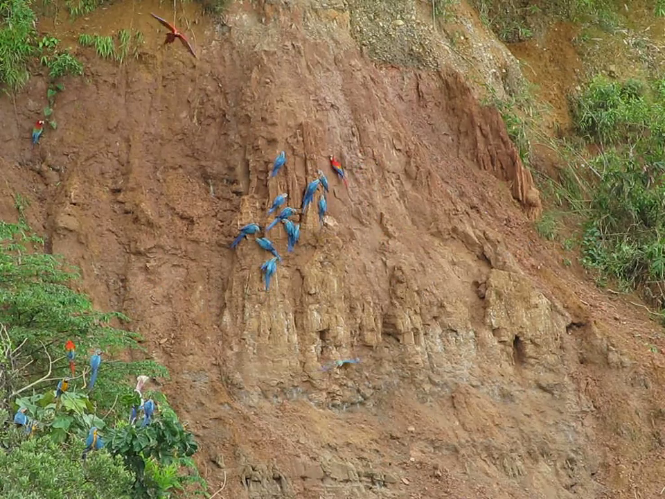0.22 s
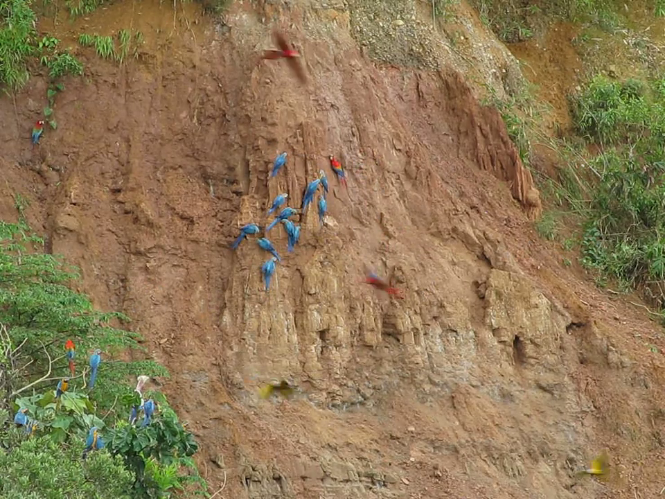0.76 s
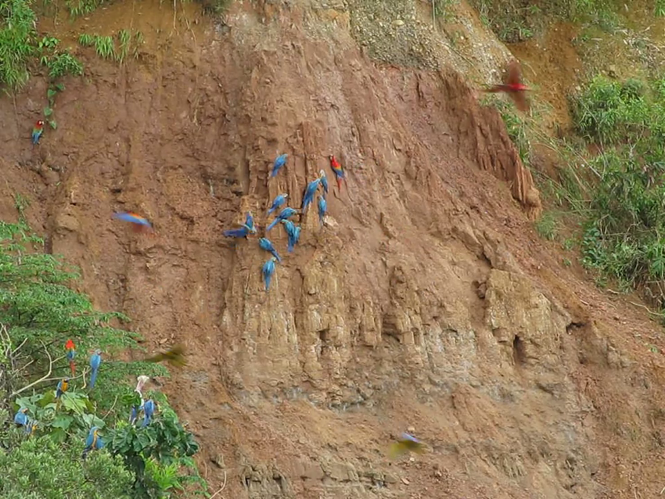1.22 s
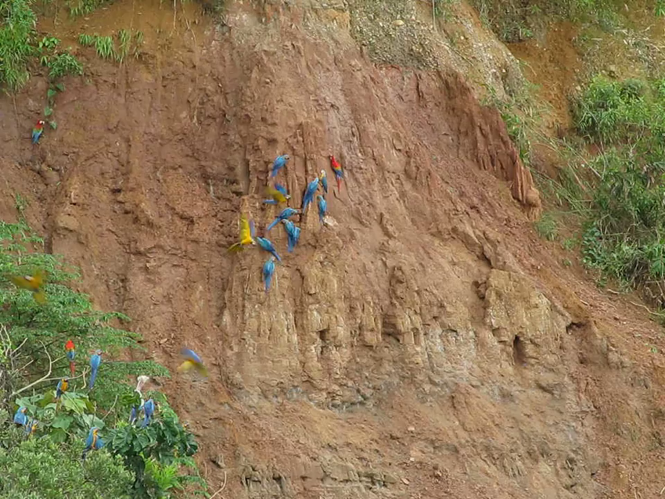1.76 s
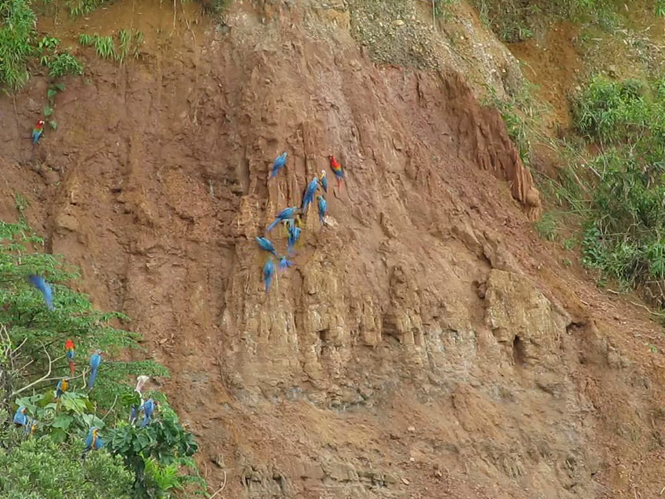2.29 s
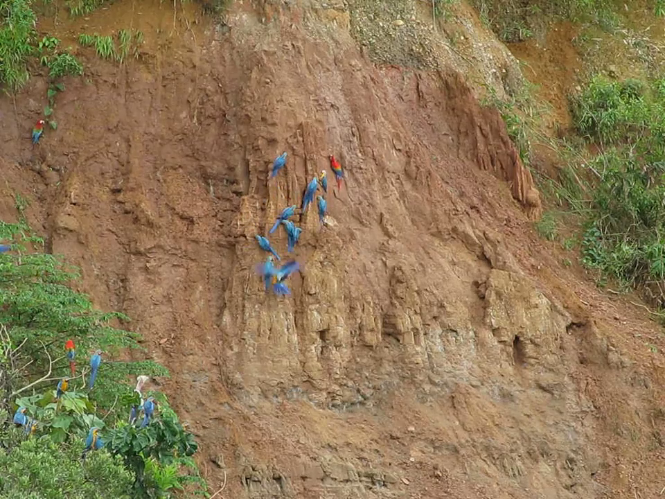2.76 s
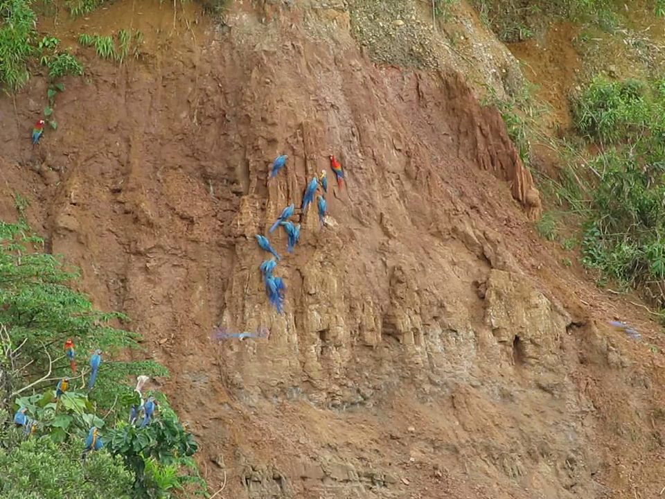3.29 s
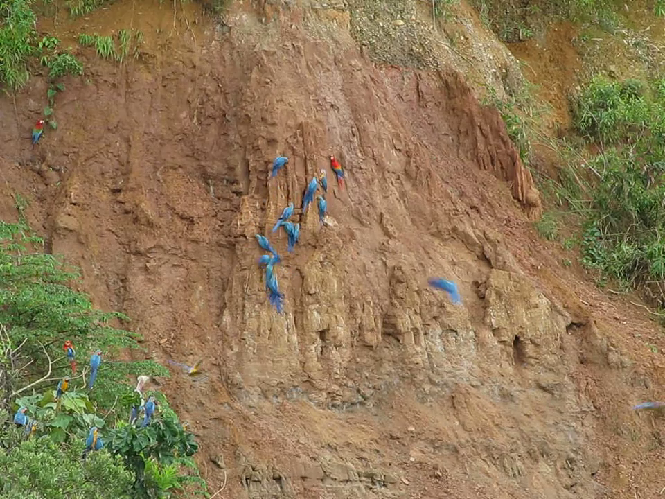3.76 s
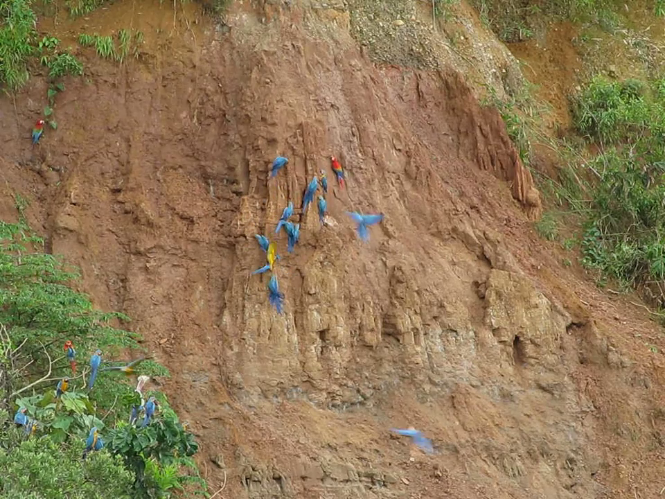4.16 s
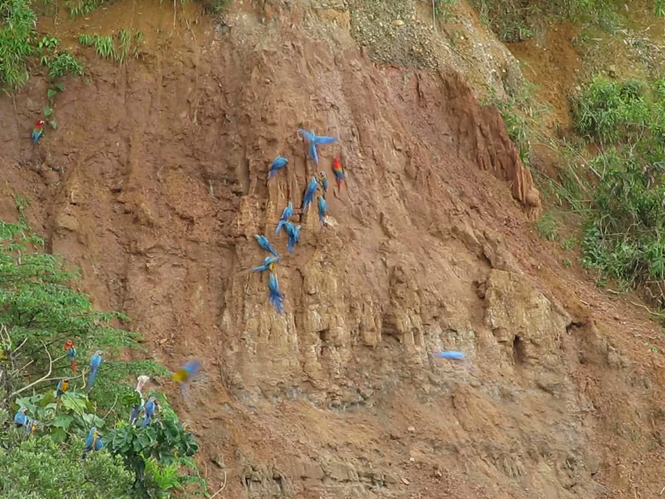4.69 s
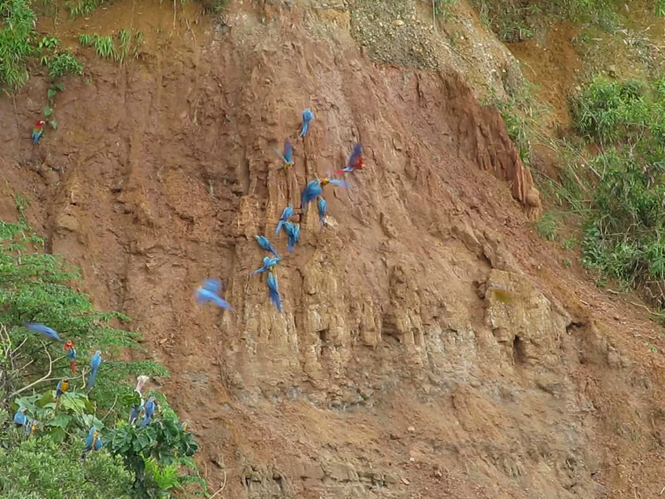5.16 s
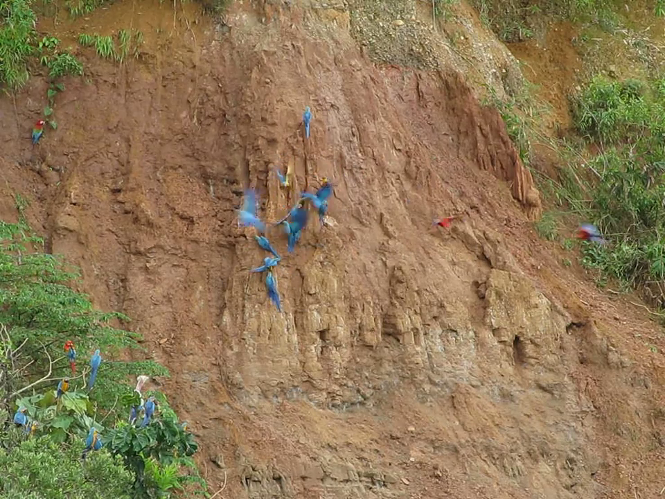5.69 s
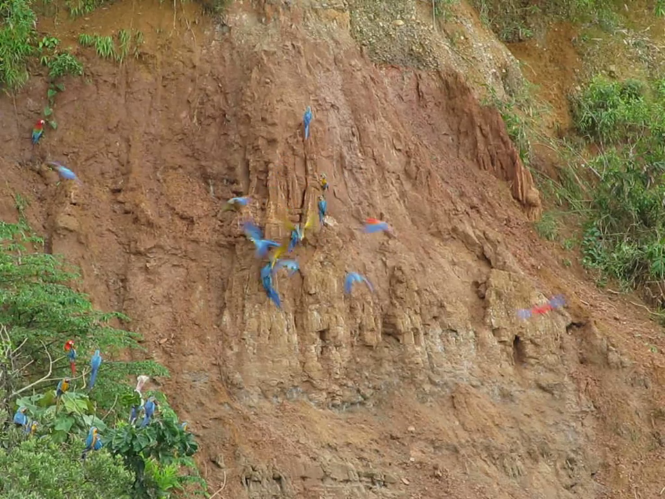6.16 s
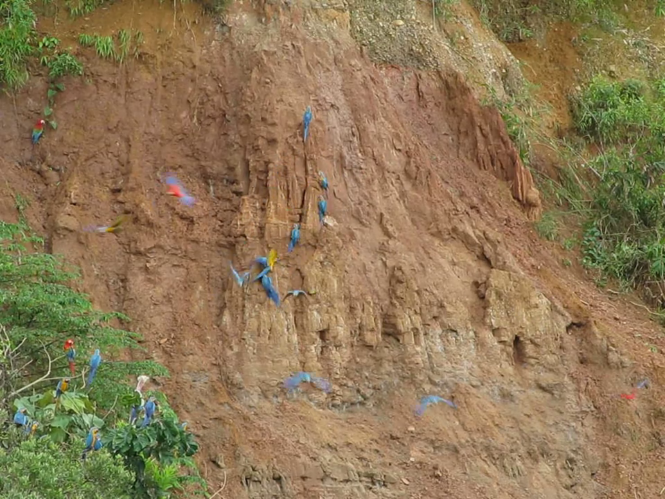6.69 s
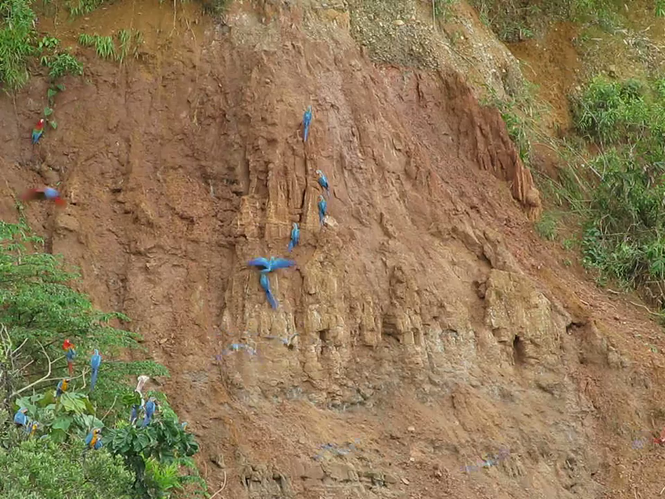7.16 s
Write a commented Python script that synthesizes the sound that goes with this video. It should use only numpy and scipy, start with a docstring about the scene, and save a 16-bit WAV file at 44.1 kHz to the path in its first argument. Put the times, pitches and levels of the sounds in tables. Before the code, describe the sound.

A flock of macaws calls hoarsely, near and far, while cicadas whine and other insects rasp in waves.

```python
"""Macaws squawk across a rainforest river, in mono: near birds in runs of quick rasping syllables that
end on a falling note, the rest of the flock blurred by a clay cliff and trees. Each voice is a train of
pulses from the syrinx, filtered by throat and beak. High above, cicadas whine with buckling tymbals
and other insects rasp their wing files in waves. Bird calls add thin whistles and short gliding tones,
a few soft knocks sound close by, and river and leaves lay a faint hush under it all."""
import sys
import numpy as np
from scipy import signal
from scipy.fft import rfft, irfft
from scipy.io import wavfile
from scipy.ndimage import uniform_filter1d

SR = 44100
rng = np.random.default_rng(int(sys.argv[2]) if len(sys.argv) > 2 else 0)


def log_audio(samples):
    """Write samples as a 16-bit WAV file to the path given in sys.argv[1]."""
    # one column per channel
    frames = np.atleast_2d(samples).T
    # limit to full scale, then quantise
    limited = np.clip(frames, -1, 1)
    pcm = np.round(limited * 32767).astype(np.int16)
    wavfile.write(sys.argv[1], SR, pcm)


N = 328104
TIME = np.arange(N) / SR

# Spectral envelopes of the sources: f/Hz, relative level/dB
HUSH_SPECTRUM = [(20, -5), (60, 1.5), (150, 1.5), (300, 3), (600, 6.5), (1200, 9), (2500, 5), (5000, 6),
                 (9000, -8), (15500, -41)]
CICADA_SPECTRUM = [(4800, -30.5), (5500, -22), (6150, -11), (6600, -15.5), (7000, -8.5), (7300, -4),
                   (7550, -2.5), (7750, -14.5), (8000, -19), (8500, -47)]
RASP_SPECTRUM = [(4000, -23), (6000, -8.5), (8200, -14), (9300, -8.5), (10500, -13), (11200, -3),
                 (11700, -1.5), (12300, -4), (13200, -9.5), (14400, -8), (15700, -12.5)]
FAR_VOICE_SPECTRUM = [(150, -59), (350, -39), (560, -23), (640, -13.5), (740, -8), (1150, -2.2),
                      (1600, 0.5), (2100, -2.5), (2800, -1), (3600, -2.5), (4600, -8), (5600, -16.5),
                      (8000, -25), (12000, -40)]
THROAT_SPECTRUM = [(120, -77), (300, -42), (450, -19.5), (700, -7), (1000, -18.5), (1400, -7), (2200, 0),
                   (3050, -3.5), (3500, -1), (4100, -0.5), (5000, -3), (5800, -8), (8000, -10),
                   (10000, -16), (15000, -49)]
# Surges of the rasping chorus: centre t/s, length/s, relative level/dB
CHORUS_SURGES = [(0.146, 0.28, -40), (0.415, 0.14, -45.5), (0.763, 0.3, -38.5), (1.42, .32, -41),
                 (1.984, .35, -41), (2.352, 0.16, -46), (2.72, 0.44, -42.5), (3.505, 0.38, -41.5),
                 (3.92, 0.14, -47.5), (4.23, 0.31, -41.5), (4.49, 0.15, -46.5), (5.054, 0.23, -45.5),
                 (5.296, 0.25, -41.5), (5.59, 0.19, -46.5), (6.158, 0.27, -42), (6.86, 0.15, -49)]
# Short lisps of another insect: centre t/s, level/dB
INSECT_LISPS = [(1.66, -55), (3.02, -56), (4.68, -54.5), (5.83, -53), (6.48, -58), (7.08, -57)]
# Soft knocks: t/s, level/dB, thud f/Hz, tick level re thud/dB
SOFT_KNOCKS = [(1.248, -42.5, 334, 11), (1.429, -53, 356, 13), (1.58, -46, 400, -6), (1.685, -50, 437, -1),
               (1.73, -50, 425, 5), (1.78, -51, 380, -6), (1.808, -51, 485, 3), (1.85, -50, 410, -8),
               (3.428, -39.5, 255, -3)]
# Thin whistles and short gliding tones of bird calls:
# start t/s, length/s, first f/Hz, middle f/Hz, last f/Hz, level/dB
GLIDING_TONES = [(1.78, 0.16, 1910, 2060, 2530, -53), (1.899, 0.16, 2300, 3010, 3150, -49.5),
                 (1.87, 0.155, 1087, 1160, 1080, -59), (2.971, .08, 2690, 2740, 2700, -55),
                 (3.011, 0.057, 3260, 3280, 3220, -46.5), (3.07, .2, 2510, 2490, 2400, -60),
                 (3.384, 0.052, 3155, 2665, 2330, -45), (4.74, 0.21, 1266, 1172, 1100, -53)]
# Far macaw calls: start t/s, end t/s, top f/Hz, roughness (0-1), beak f/Hz, relative level/dB
FAR_SQUAWKS = [(-.15, 0.061, 412, .4, 1800, -39.5), (0.06, 0.51, 412.2, 0.46, 1760, -37.5),
               (0.23, 0.511, 525, .47, 1500, -37), (0.529, 0.95, 469, 0.56, 1610, -33.5),
               (0.86, 1.238, 455.5, 0.54, 1360, -43), (1.21, 1.68, 424, 0.36, 2130, -42),
               (1.3, 1.918, 398.4, 0.55, 1240, -50), (1.989, 2.22, 517.3, 0.18, 1580, -41),
               (2.1, 2.5, 513, .12, 2050, -36.5), (2.42, 2.749, 407, 0.45, 1640, -40.5),
               (2.699, 2.919, 480, 0.36, 1450, -55.5), (3.19, 3.316, 391, 0.76, 1570, -59),
               (3.419, 3.631, 379, 0.53, 1150, -43.5), (3.48, 3.639, 400, 0.57, 3330, -47),
               (3.85, 4.22, 423.6, .45, 1800, -40), (4.239, 4.621, 508.4, 0.48, 2060, -42.5),
               (4.702, 5.001, 398, 0.63, 1200, -54), (4.83, 5.149, 405.2, 0.39, 1560, -39.5),
               (4.869, 5.421, 386.5, 0.57, 810, -42.5), (5.199, 5.552, 410.6, 0.36, 1600, -38.5),
               (5.35, 5.747, 471.6, .35, 2630, -39), (5.45, 5.85, 474, 0.54, 1020, -44.5),
               (5.8, 6.139, 420, .55, 1290, -55), (6.081, 6.301, 384.7, .55, 1150, -39.5),
               (6.28, 6.65, 385.2, 0.64, 834, -39.5), (6.69, 6.811, 408.8, 0.13, 1620, -39),
               (6.8, 7.2, 426.6, 0.51, 1750, -40), (6.949, 7.21, 612, 0.22, 1260, -48.5)]
# Near macaw calls, each a run of evenly spaced syllables and a closing note:
# first t/s, spacing/s, count, first f/Hz, middle f/Hz, closing f/Hz, first level/dB, last level/dB,
# closing centre t/s, closing length/s, closing level/dB, fall coefficient/semitones,
# beak f/Hz, low resonance trim/dB, roughness (0-1)
NEAR_SQUAWKS = [(0.129, 0.039, 4, 409.5, 443.5, 453, -36.5, -37, 0.278, 0.035, -34, 2, 2900, 5, .28),
                (0.351, 0.04, 3, 429, 412, 365, -30.5, -36, 0.484, 0.036, -33, 5.1, 2950, 15, 0.38),
                (0.593, 0.039, 5, 462.7, 453, 492, -21, -20.5, 0.785, 0.04, -21, 14, 2800, -12, .2),
                (0.842, 0.041, 3, 421.3, 432, 472, -31, -28, 0.97, 0.05, -28.5, 9, 2850, 1, .2),
                (1.238, 0.03, 1, 433, 433, 431, -38, -40, 1.27, 0.05, -35, 2.1, 3130, 6, .59),
                (1.382, 0.042, 3, 392.4, 416, 440, -40.5, -36, 1.506, 0.044, -35, 5.2, 2530, 7, 0.23),
                (2.136, 0.03, 1, 506, 524, 535, -37, -37, 2.187, 0.06, -34.5, 4.3, 2150, -1, 0.25),
                (2.324, 0.03, 1, 401, 396, 396, -39, -39, 2.366, 0.05, -34.5, 2, 2800, 9, 0.45),
                (2.521, 0.038, 4, 375, 379, 414.2, -35, -31.5, 2.683, 0.04, -28, 9, 2770, 0.5, 0.44),
                (3.842, 0.038, 5, 382, 428, 446, -35.5, -27.7, 4.055, 0.062, -26.5, 12, 2560, 4.5, 0.16),
                (4.109, 0.03, 1, 337, 336, 333, -32.5, -32, 4.147, 0.03, -37, 1.8, 3150, 10, 0.92),
                (4.283, 0.038, 2, 412, 450, 513, -41, -38, 4.358, 0.06, -39.5, 1.87, 2600, 23, .5),
                (5.053, 0.04, 1, 421, 430, 441, -41, -40, 5.098, 0.045, -37, 3, 2900, 9, .5),
                (5.24, 0.043, 5, 378.7, 428, 425.7, -37.5, -29, 5.442, 0.028, -31, 10, 3200, 8, .22),
                (6.381, 0.042, 5, 426, 434, 464, -36.5, -32.5, 6.595, 0.04, -32, 10, 2730, -9, 0.15),
                (6.744, 0.04, 1, 400, 398, 394, -33, -33, 6.784, 0.031, -33.5, 2.5, 2530, 9, .08),
                (6.825, 0.046, 2, 436, 455, 454, -36, -35, 6.907, 0.032, -35, 4.4, 2730, -9, 0.37),
                (7.008, 0.047, 3, 406.3, 428, 431, -36.5, -37.5, 7.158, 0.046, -39.5, 3.2, 2750, -3, 0.47)]


def undb(db):
    """Amplitude ratio of a level in decibels."""
    return 10 ** (np.asarray(db) / 20)


def unit(x):
    """Normalisation to an rms of one."""
    return x / np.sqrt(np.mean(x ** 2) + 1e-18)


def running_rms(x, seconds):
    """Envelope as the root of a moving average of power."""
    return np.sqrt(np.abs(uniform_filter1d(x ** 2, int(seconds * SR))) + 1e-12)


def add(out, start, x):
    """Superposition of x on out from a start time on."""
    i = int(start * SR)
    a, b = max(i, 0), min(i + len(x), N)
    out[a:b] += x[a - i:b - i]


def walk(rate, size=N):
    """Smooth random modulation with a spread near one."""
    knots = rng.standard_normal(int(size / SR * rate) + 3)
    line = np.interp(np.arange(size) * rate / SR, np.arange(len(knots)), knots)
    return 1.25 * uniform_filter1d(line, int(SR / rate / 2) + 1)


def arc(u, first, middle, last):
    """Parabolic interpolation through three values as u runs from -1 to 1."""
    return middle + u * (last - first) / 2 + u ** 2 * ((last + first) / 2 - middle)


def sine(hz):
    """Oscillation whose phase is the integral of its frequency."""
    return np.sin(2 * np.pi * np.cumsum(hz) / SR)


def colour(x, points, size=2048):
    """Minimum-phase filtering by a spectral envelope (f/Hz, level/dB)."""
    hz, db = np.transpose(points)
    bin_hz = np.arange(size // 2 + 1) * SR / size
    log_gain = np.log(undb(np.interp(np.log(bin_hz + 1), np.log(hz), db)))
    cepstrum = irfft(log_gain)[:size // 2]
    cepstrum[1:] *= 2
    response = irfft(np.exp(rfft(cepstrum, size)))[:size // 2]
    return signal.fftconvolve(x, response)[:len(x)]


def resonance(x, hz, width_hz):
    """Two-pole resonance with a gain of one at its centre."""
    return signal.lfilter(*signal.iirpeak(hz, hz / width_hz, fs=SR), x)


def noise_band(size, hz, width_hz):
    """Band-limited noise: white noise through two equal resonances."""
    return unit(resonance(resonance(rng.standard_normal(size), hz, width_hz), hz, width_hz))


def scatter(x, t60, build_s, leaf_db):
    """Reverberation: clay and trees scatter dense echoes, with the treble shelved by leaf_db."""
    t = np.arange(int(t60 * SR)) / SR
    echoes = rng.standard_normal(len(t)) * 10 ** (-3 * t / t60) * (1 - np.exp(-t / build_s))
    echoes = colour(echoes, [(1500, 0), (6000, leaf_db)])
    return signal.fftconvolve(x, unit(echoes) / np.sqrt(len(t)))[:N]


def forest(db=-56):
    """Broadband noise: the faint, even hush of river and leaves."""
    return undb(db + .5 * walk(1.53)) * unit(colour(rng.standard_normal(N), HUSH_SPECTRUM))


def cicadas(click_hz=80, buzz_db=.5, db=-46.5):
    """Rapid buckling of tymbals merges into a steady, grainy whine of modulated noise."""
    beat = sine(click_hz * (1 + .01 * walk(2.97)))
    drive = rng.standard_normal(N) * undb(buzz_db * beat + .33 * walk(300) + .5 * walk(3.06))
    return undb(db) * unit(colour(drive, CICADA_SPECTRUM))


def rasping_insects(flatness=2.5, lull_db=-54.5):
    """Stridulation: wing files scrape in rounded surges, whose powers add over a quiet lull."""
    teeth = rng.standard_normal(N) * undb(.74 * walk(600))
    power = sum(undb(db) ** 2 * np.exp(-2 * np.abs((TIME - centre) / (.57 * length)) ** flatness)
                for centre, length, db in CHORUS_SURGES)
    envelope = np.sqrt(power + undb(lull_db) ** 2)
    return undb(1) * envelope * unit(colour(teeth, RASP_SPECTRUM))


def lisping_insect(half_width_s=.095):
    """Amplitude modulation: Gaussian swells of a high noise band are heard as lisps."""
    envelope = sum(undb(db) * np.exp(-((TIME - centre) / half_width_s) ** 2)
                   for centre, db in INSECT_LISPS)
    return envelope * noise_band(N, hz=10700, width_hz=1100)


def knocks(thud_decay_s=.0057, tick_decay_s=.0054, rise_s=.00049):
    """Damped vibration: three inharmonic modes make a dull thud, a noise burst its woody tick."""
    out, t = np.zeros(N), np.arange(SR // 8) / SR
    for start, db, hz, tick_db in SOFT_KNOCKS:
        phase = 2 * np.pi * hz * t
        modes = np.sin(phase) - .39 * np.sin(.75 * phase) - .5 * np.sin(1.41 * phase)
        thud = modes * np.exp(-t / thud_decay_s)
        tick = noise_band(len(t), hz=1030, width_hz=900) * np.exp(-t / tick_decay_s)
        add(out, start, undb(db) * (thud + undb(tick_db) * tick) * (1 - np.exp(-t / rise_s)))
    return out


def gliding_tones(waver=.013):
    """Frequency modulation: thin whistles and short gliding tones of bird calls, blurred by trees."""
    out = np.zeros(N)
    for start, length, first_hz, middle_hz, last_hz, db in GLIDING_TONES:
        u = np.linspace(-1, 1, int(length * SR))
        hz = arc(u, first_hz, middle_hz, last_hz) * (1 + waver * walk(200, len(u)))
        add(out, start, undb(db) * (1 - u ** 2) * sine(hz))
    return out + scatter(out, t60=.17, build_s=.002, leaf_db=-5.5)


def syrinx(hz, rough):
    """Pulse excitation, once a cycle; roughness scatters timing and size and adds to the hiss of air."""
    size, rough = len(hz), np.clip(rough, 0, 1)
    jitter, shimmer_db, hiss = .13 * rough ** 2, 5 * rough, .1 + .7 * rough
    phase = np.cumsum(hz) / SR
    chance = rng.standard_normal((640, 2))
    cycles = np.arange(1, int(phase[-1]))
    pulse_at = np.interp(cycles + jitter * chance[cycles, 0], phase, np.arange(size))
    taps = pulse_at.astype(int)[:, None] + np.arange(-6, 7)
    clicks = np.sinc(taps - pulse_at[:, None]) * undb(shimmer_db * chance[cycles, 1:])
    pulses = np.bincount(np.clip(taps, 0, size - 1).ravel(), clicks.ravel(), size)
    air = rng.standard_normal(size) * np.exp(-(phase % 1) / .36)  # a puff in each cycle
    return -unit(pulses) + hiss * unit(air)


def long_squawk(length, pitch, rough, throb_hz=25, throb_db=4, sag=.17, waver=.025):
    """Joint modulation of level and frequency: a call throbs as its pitch rises and sinks."""
    size = int(length * SR)
    u = np.linspace(-1, 1, size)
    throb = sine(throb_hz * (1 + .1525 * walk(9.8, size)))
    wobble = .5 * throb + walk(30, size) + rough * walk(250, size)
    hz = pitch * (1 - sag * np.abs(u) ** 3 + waver * wobble)
    return syrinx(hz, rough) * undb(throb_db * throb) * np.sqrt(1 - u ** 2)


def far_macaws(crowd_db=-3.5, murmur_db=-54.5, linger_s=.18, direct_db=-4, cliff_db=-3.5):
    """Direct and reflected sound: single callers and a hoarse crowd arrive with the cliff's echo."""
    calls, crowd = np.zeros(N), np.zeros(N)
    for start, end, pitch, rough, beak_hz, db in FAR_SQUAWKS:
        source = long_squawk(end - start, pitch, rough)
        voice = source + undb(3) * resonance(source, beak_hz, width_hz=550)
        add(calls, start, undb(db) * unit(colour(voice, FAR_VOICE_SPECTRUM)))
    for start in np.arange(-.2, N / SR, .16):
        add(crowd, start, long_squawk(rng.uniform(.25, .4), rng.uniform(330, 620), rough=.85))
    crowd = colour(crowd, FAR_VOICE_SPECTRUM)
    # the crowd joins in under each call and never falls quite silent
    excitement = np.hypot(undb(crowd_db) * running_rms(calls, linger_s), undb(murmur_db))
    flock = calls + excitement * crowd / running_rms(crowd, linger_s)
    echo = scatter(flock, t60=.46, build_s=.0009, leaf_db=.5)
    return undb(direct_db) * flock + undb(cliff_db) * echo


def syllables(length=.02708, glide=.1, catch_lead_s=.024, catch_db=-9.5, catch_rough=.48, follow=.86):
    """Pitch contour of each squawk: a hoarse catch, syllables along an arc, a note that falls away."""
    for (first_s, spacing, count, first_hz, middle_hz, close_hz, first_db, last_db,
         close_s, close_length, close_db, fall, beak_hz, low_db, rough) in NEAR_SQUAWKS:
        yield (first_s - catch_lead_s, length, first_hz, glide, 0,
               first_db + catch_db, beak_hz, low_db, catch_rough)
        beak = lambda hz: beak_hz * (hz / middle_hz) ** follow  # the beak opens with the pitch
        for k, db in enumerate(np.linspace(first_db, last_db, count)):
            hz = arc(2 * k / count - 1, first_hz, middle_hz, close_hz)
            yield first_s + k * spacing, length, hz, glide, 0, db, beak(hz), low_db, rough
        yield close_s, close_length, close_hz, 0, fall, close_db, beak(close_hz), low_db, rough


def beak_formants(source, beak_hz, shut, db, low_db, full_voice_db=-20, width_hz=440):
    """Cavity resonance: three formants colour the voice, the main one dropping as the beak shuts."""
    effort_db = db - full_voice_db
    damped_width_hz = width_hz * np.exp(-.05 * effort_db)  # softer calls ring less sharply
    open_ring = resonance(source, beak_hz, damped_width_hz)
    shut_ring = resonance(source, .82 * beak_hz, damped_width_hz)
    main = undb(13) * ((1 - shut) * open_ring + shut * shut_ring)
    low = undb(13 + low_db) * resonance(source, hz=1720, width_hz=450)
    # the upper resonance stands out when the bird calls hard
    upper = undb(3 + 2.8 * effort_db) * resonance(source, 1.53 * beak_hz, width_hz)
    return source + main + low + upper


def clay_bounces(voice, db=-5, decay_s=.004):
    """Interference: reflections from the clay just behind the bird lift some harmonics and sink others."""
    size = len(voice)
    bounces = rng.standard_normal(size) * np.exp(-np.arange(size) / SR / decay_s)
    return voice + undb(db) * signal.fftconvolve(voice, bounces / np.linalg.norm(bounces))[:size]


def near_macaws(arch_semitones=1.2, fall_from=-.22, waver=.022, size=4608):
    """Source and filter: each syllable is an arch of pitch, its pulses ringing in throat and beak."""
    out = np.zeros(N)
    t = (np.arange(size) - size / 2) / SR
    for centre, length, pitch, glide, fall, db, beak_hz, low_db, rough in syllables():
        # no two syllables come out quite alike
        glide += .6 * rng.standard_normal()
        beak_hz *= 1 + .026 * rng.standard_normal()
        rough = abs(rough + .075 * rng.standard_normal())
        u = np.clip(t / length, -1, 1)
        sunk_semitones = fall * np.maximum(u - fall_from, 0) ** 2
        hz = pitch * 2 ** ((glide * u - arch_semitones * u ** 2 - sunk_semitones) / 12)
        # as the pitch sinks the beak shuts and the voice breaks up
        shut = np.clip(sunk_semitones / 3.9, 0, 1)
        wobble = waver * (rough + .42 * shut) * walk(254, size)
        source = syrinx(hz * (1 + wobble), rough)
        voice = clay_bounces(beak_formants(source, beak_hz, shut, db, low_db))
        voice = unit(colour(voice, THROAT_SPECTRUM, size=1024))
        swell = np.exp(-np.abs(t / (.65 * length)) ** 2.36)
        add(out, centre - size / 2 / SR, undb(db) * swell * voice)
    return out


def scene():
    """Superposition of birds, cliff echo, knocks, insects and forest, the same in both channels."""
    birds = near_macaws() + gliding_tones()
    echo = undb(-10) * scatter(birds, t60=.73, build_s=.0096, leaf_db=-4)
    mono = birds + echo + far_macaws() + knocks()
    mono += cicadas() + rasping_insects() + lisping_insect() + forest()
    return np.array([mono, mono])


def record(dry, cutoff_hz=15750):
    """Steep low-pass filtering removes the highest treble."""
    return signal.sosfilt(signal.ellip(12, .1, 80, cutoff_hz, fs=SR, output="sos"), dry)


dry = scene()
out = record(dry)
log_audio(out)
```